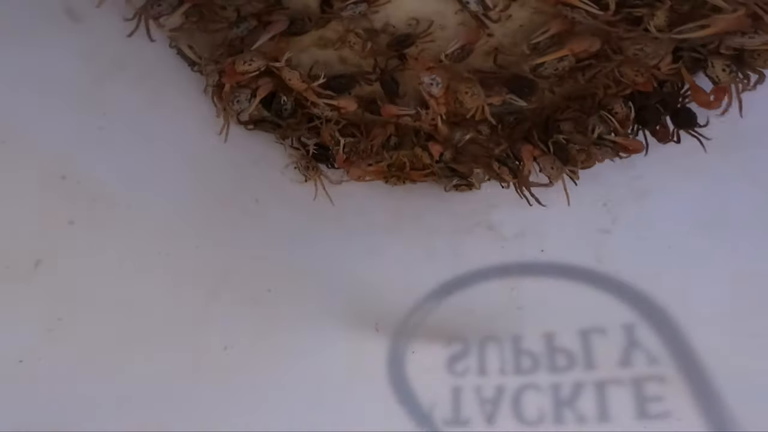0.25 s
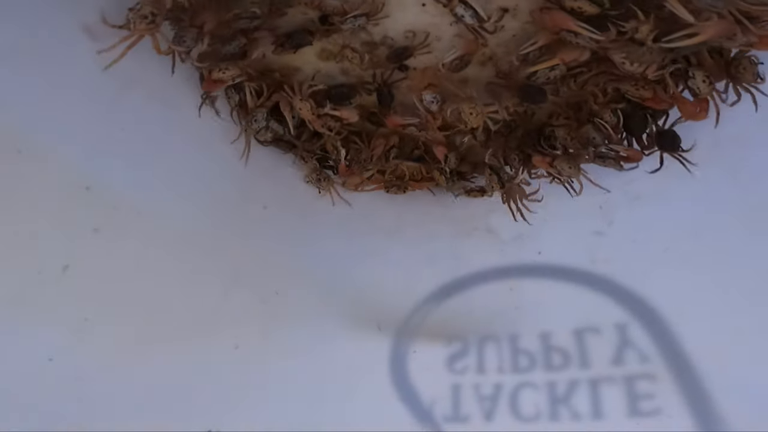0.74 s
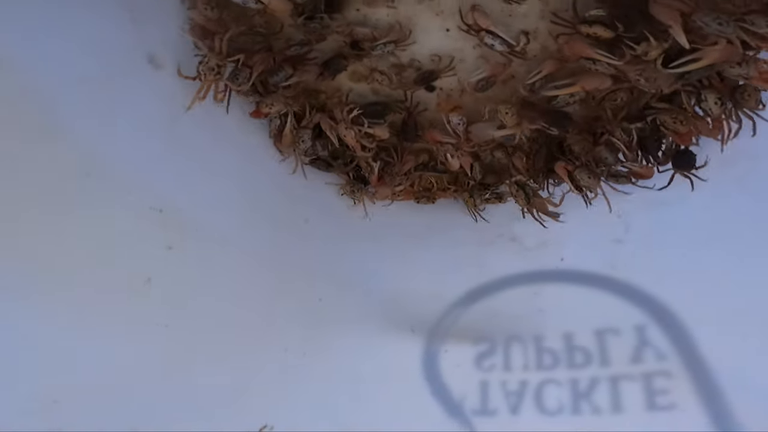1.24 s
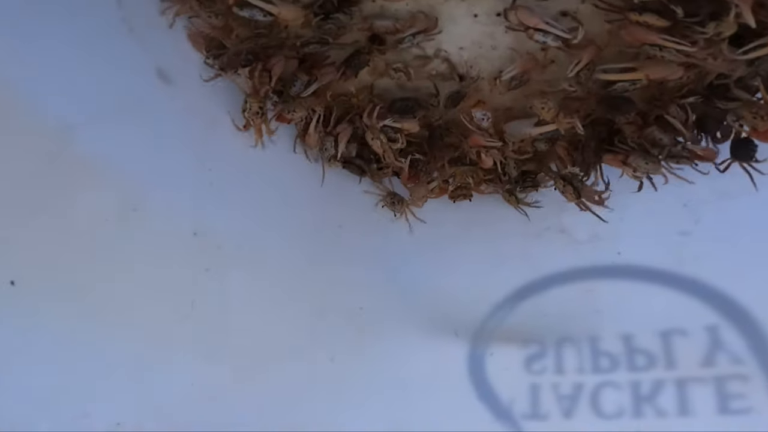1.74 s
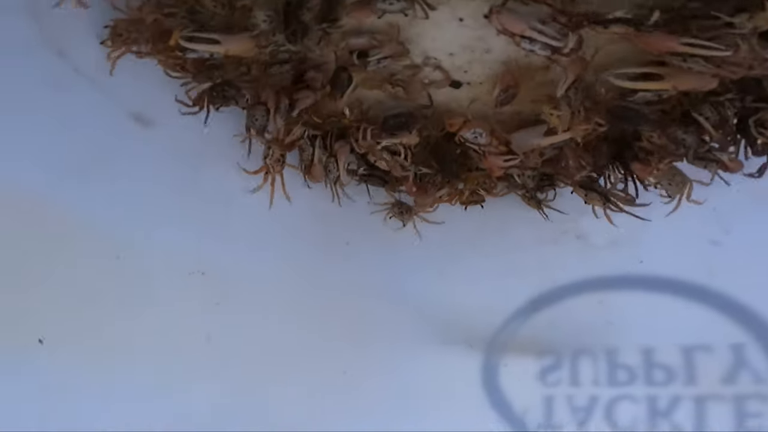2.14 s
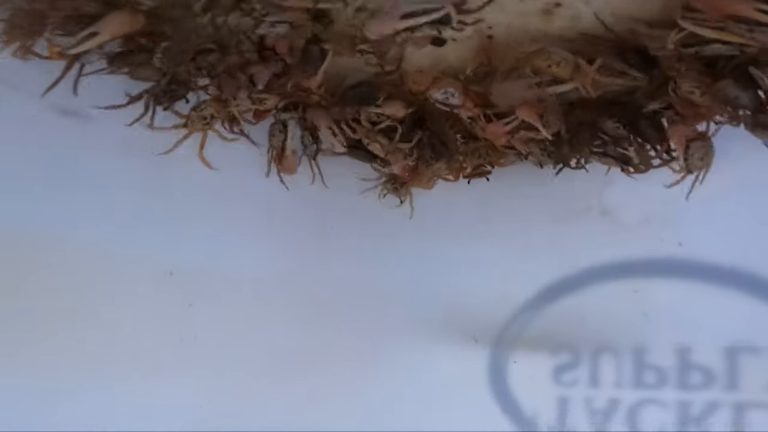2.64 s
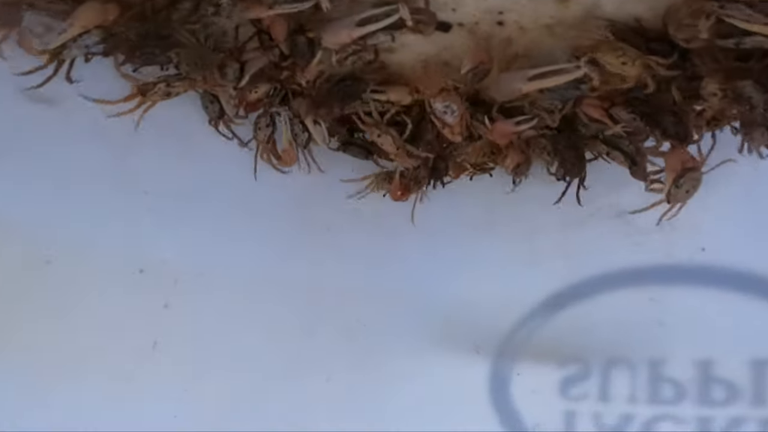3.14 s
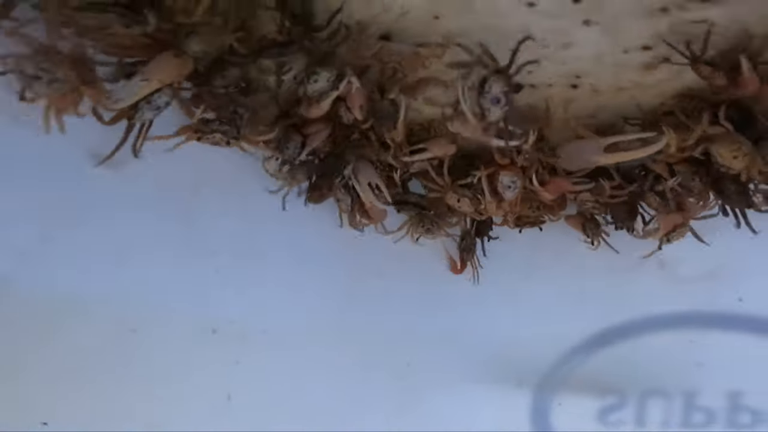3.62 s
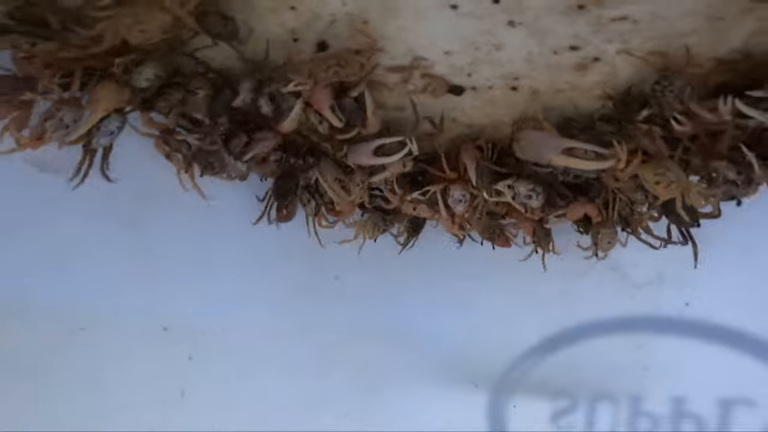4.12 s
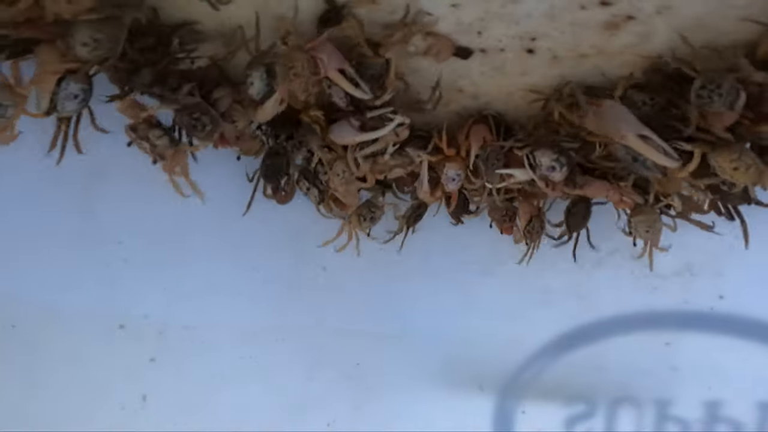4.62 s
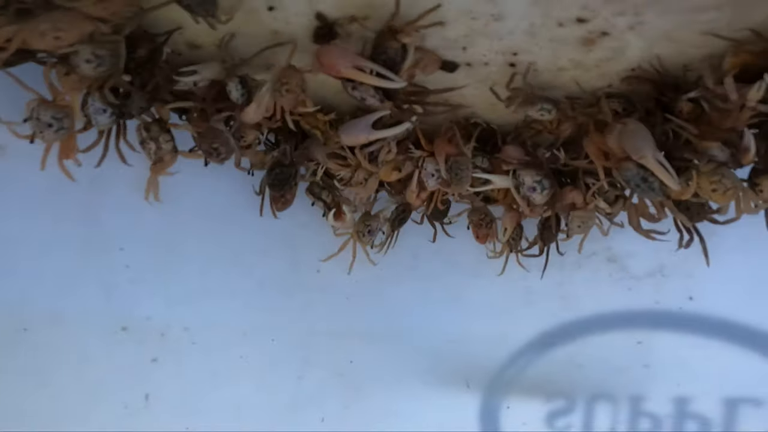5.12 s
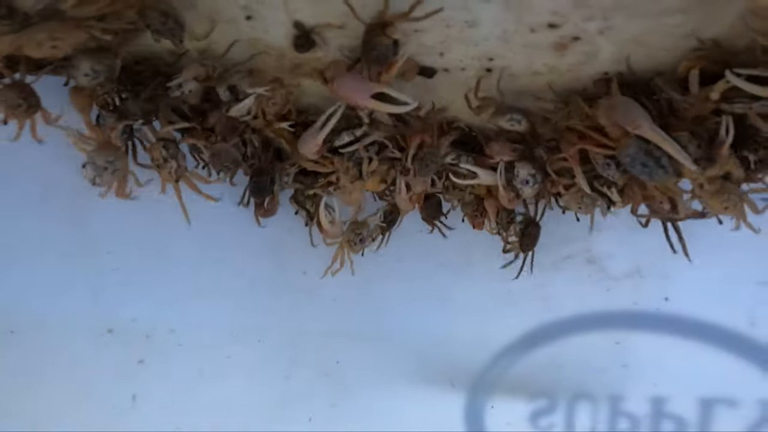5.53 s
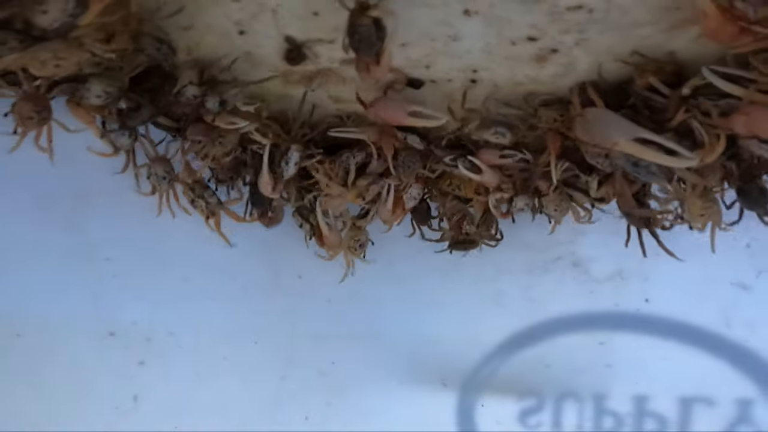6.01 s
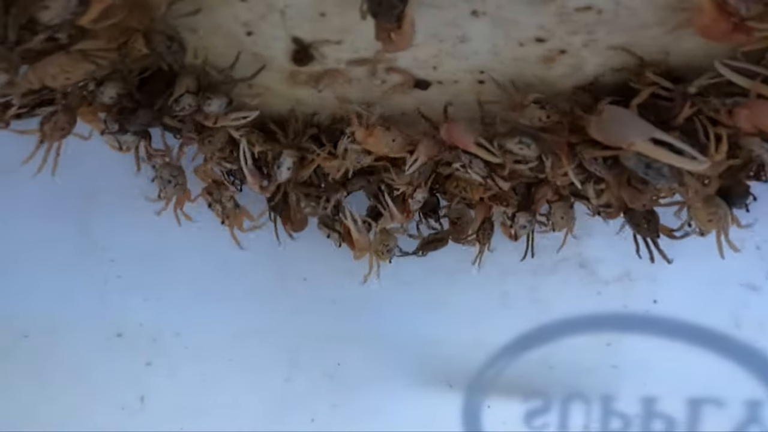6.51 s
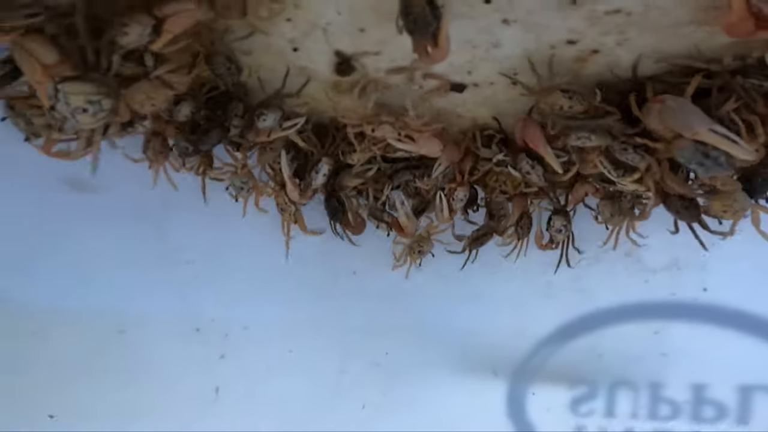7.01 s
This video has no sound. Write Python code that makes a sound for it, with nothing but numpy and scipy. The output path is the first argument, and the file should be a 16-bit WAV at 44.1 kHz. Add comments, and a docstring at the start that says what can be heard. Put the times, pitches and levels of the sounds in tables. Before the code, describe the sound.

Small live crabs scramble inside a plastic bucket as a microphone is lowered into it. At first their legs patter and scratch faintly over a low hollow boom. Dull knocks and brief rubbing on the bucket wall follow and stand out through the first half. The scrabbling then grows louder, closer and wider, with many sharp claw taps and short skids ringing lightly in the plastic.

```python
"""Small live crabs scramble in a plastic bucket as a microphone is lowered into it.
Legs patter and scratch on the wall and claws tap it; patter and taps ring the bucket's modes.
The wall booms under the swarm, thuds and swells when knocked, and rustles when rubbed.
Microphone depth changes which modes are heard; the stereo image opens near the swarm."""
import sys
import numpy as np
from scipy import signal
from scipy.io import wavfile

SR = 44100
rng = np.random.default_rng(int(sys.argv[2]) if len(sys.argv) > 2 else 0)


def wrap_up_sound(samples):
    """Save the sound to the file named by the first command line argument, as 16-bit audio."""
    columns = np.atleast_2d(samples).T
    # keep every value between -1 and 1, then stretch to whole-number steps
    tamed = np.clip(columns, -1, 1)
    steps = np.round(tamed * 32767).astype(np.int16)
    wavfile.write(sys.argv[1], SR, steps)


N = 320158


def amp(db):
    return 10 ** (np.asarray(db) / 20)


def unit_rms(x):
    return x / np.sqrt(np.mean(x ** 2) + 1e-20)


def butter(x, hz, kind="low", order=2):
    return signal.sosfilt(signal.butter(order, hz, kind, fs=SR, output="sos"), x)


def in_time(rows):
    times, *columns = np.transpose(rows)
    return [np.interp(np.arange(N) / SR, times, column) for column in columns]


def at_hz(rows, hz):
    freqs, values = np.transpose(rows)
    return np.interp(np.log(hz), np.log(freqs), values)


def drift(rate_hz):
    """Slow random wander, rms 1."""
    hop = 40
    r = np.exp(-2 * np.pi * rate_hz * hop / SR)
    slow = signal.lfilter([1], [1, -2 * r, r * r], rng.standard_normal(N // hop + 2002))[2000:]
    return np.interp(np.arange(N) / hop, np.arange(len(slow)), unit_rms(slow))


def ring(clicks, hz, t60_s):
    """One mode: a unit click starts a decaying sine of height 1."""
    r, w = amp(-60 / (t60_s * SR)), 2 * np.pi * hz / SR
    return signal.lfilter([0, np.sin(w)], [1, -2 * r * np.cos(w), r * r], clicks + 1e-18)


def grains(per_s, spread_db):
    """Random touches of uneven size, rms 1."""
    sizes = amp(spread_db * np.minimum(rng.exponential(1, N), 5)) * rng.choice([-1, 1], N)
    return unit_rms(sizes * (rng.random(N) < per_s / SR))


def strikes(times, levels_db):
    clicks = np.zeros(N)
    clicks[np.round(times * SR).astype(int)] = amp(levels_db)
    return clicks


def swell(clicks, rise_s):
    """Envelope: rises to each click's height in rise_s, then fades."""
    r = np.exp(-1 / (rise_s * SR))
    return signal.lfilter([np.e * (1 - r)], [1, -2 * r, r * r], clicks + 1e-18)


# Swarm activity: t/s, patter level/dB, sliding level/dB
SWARM = [(0.0, -54.5, -58.5), (.4, -54.5, -62), (.93, -56, -57), (1.3, -46, -54), (1.58, -43.5, -52),
         (1.82, -56.5, -57), (2.2, -46.5, -53.5), (2.5, -50.5, -52.5), (2.72, -43.5, -48.5),
         (3.1, -46.5, -50.5), (3.5, -44, -47.5), (3.95, -48, -51), (4.2, -45, -51), (5.1, -43.5, -50.5),
         (5.46, -39.5, -45), (5.8, -43, -47), (6.45, -41, -46), (7.26, -38.5, -45)]


def leg_patter():
    """Feet land on the wall at a wandering rate."""
    patter_db, _ = in_time(SWARM)
    return grains(per_s=350 * amp(3 * drift(7.6)), spread_db=4) * amp(patter_db - 31)


# Scratch spectrum: f/Hz, density/dB
SCRATCH_SPECTRUM = [(250, 3), (400, -42.5), (700, -15.5), (1200, -15), (2400, -15.5), (5000, -20.5),
                    (7400, -25.5), (8500, -34.5), (10500, -35.5), (13500, -36)]
# Scratch left-right likeness: f/Hz, coherence/0-1
SCRATCH_COHERENCE = [(300, 0.85), (1000, 0.27), (3000, 0.47), (6000, 0.48), (9000, 0.24), (13000, 0.22)]
# Claw skids: t/s, level/dB, top-octave offset/dB
SKIDS = [(1.5189, -41, -30), (2.239, -32, -24), (2.3391, -37, -19), (2.6778, -40, -30),
         (2.7397, -33.5, -26), (2.875, -24.5, -19), (2.9731, -42, -26), (3.2824, -35, -19),
         (3.4915, -34, -21), (3.543, -25.5, -23), (3.572, -25, -20), (3.66, -22.5, -34), (3.7219, -31, -31),
         (4.166, -31, -27), (4.3076, -33, -34), (4.5804, -33.5, -27), (4.6119, -37, -24),
         (4.7711, -29, -26), (4.796, -30, -24), (4.9467, -36, -23), (4.9985, -34, -28), (5.0664, -34, -25),
         (5.083, -31, -28), (5.2919, -32, -16), (5.4176, -31, -32), (5.4959, -30, -20), (5.554, -33.5, -24),
         (6.2736, -31, -24), (6.3375, -34, -25), (6.4388, -29.5, -26), (6.6174, -41, -26),
         (6.7456, -30, -16), (7.012, -41, -24), (7.095, -22.5, -21)]


def leg_scratch(depth):
    """Pointed legs slide on smooth plastic: dense grains, flaring at each skid, brighter close up."""
    _, sliding_db = in_time(SWARM)
    times, skid_db, top_db = np.transpose(SKIDS)
    rise_s = 0.0055
    flare = swell(strikes(times, skid_db - 12), rise_s)
    top_flare = swell(strikes(times, skid_db + top_db + 1.6), rise_s)
    small_skids = swell(np.abs(grains(per_s=70, spread_db=-2.5)), rise_s)
    sliding = amp(sliding_db + 0.5 + 1.97 * drift(11)) * (1 + 0.18 * unit_rms(small_skids))
    grit = np.sqrt(0.65 + 0.24 * grains(per_s=3600, spread_db=-0.5) ** 2)
    noise = rng.standard_normal((2, 2, N)) * grit
    edges_hz = 250 * 2 ** np.arange(0, 6.1, 0.5)
    out = np.zeros((2, N))
    for k, (low_hz, high_hz) in enumerate(zip(edges_hz, edges_hz[1:])):
        mid, side = butter(noise[k % 2], [low_hz, high_hz], "band")
        hz = np.sqrt(low_hz * high_hz)
        if low_hz > 7900:
            level = sliding * amp(4 * depth) + top_flare
        else:
            level = sliding + flare * (low_hz > 1900)
        gain = level * amp(at_hz(SCRATCH_SPECTRUM, hz) + 20.5 + 1.6 * drift(26.5))
        coherence = at_hz(SCRATCH_COHERENCE, hz)
        out += gain * (np.sqrt(1 + coherence) * mid + np.sqrt(1 - coherence) * side * [[1], [-1]])
    return out * amp([[0.85], [-0.85]])


# Bucket modes: f/Hz, rim level/dB, bottom level/dB, t60/s, left bias/dB, right lead/rad
BUCKET_MODES = [(546, -18.5, -1.5, 0.093, 1, 0.6), (748.5, -14, -4.5, 0.084, 2, 1.32),
                (908, -22, 0, 0.11, 7, 1.4), (1009, 3.5, -10.5, 0.12, 5, 1.18),
                (1255, 12.5, -24, 0.072, 8, 2), (1361, -10, -12.5, 0.28, -3.5, 1.71),
                (1574, -2.5, 7.5, 0.082, 1.5, -0.7), (1675, 1, 0.5, 0.08, -8.5, -1.1),
                (1740, -16, -10.5, 0.27, 5, 0.5), (1954, -10.5, -5.5, 0.095, -0.5, 1.58),
                (2120, -2.5, -13.5, .05, -7, 0.5), (2246, -2.5, -4, 0.11, 12, 0.4),
                (2240, -30, -31, .06, -4, -4), (2600, -10.5, -9, 0.13, -4, 1.2),
                (2700, -26.5, -14.5, 0.18, 13, .9), (2922, -6, -14, 0.16, 4.5, 0.6),
                (3146, -14.5, -12, 0.096, 6, 2.2), (3365, -2, -15.5, 0.059, -8, 1.5),
                (3700, -33, -42, .04, 8, 2), (3810, -19, -29, 0.13, 16, 1), (4184, -19, -14.5, 0.2, 0, 1.4),
                (4730, -39, -31, 0.042, 3, -8), (4800, -35, -39, .035, -0.5, -0.5)]


def bucket_ring(depth, rub_db):
    """Patter and taps ring every mode, weighted anew per touch; knocks ring two, rubbing one."""
    hollow_hz, wall_hz = 755, 547
    patter, knocks = leg_patter(), knock_pushes()
    out = np.zeros((2, N))
    for hz, rim_db, bottom_db, t60_s, pan_db, lead_rad in BUCKET_MODES:
        pickup = amp(rim_db + (bottom_db - rim_db) * depth)
        force = (patter * rng.standard_normal(N) + claw_taps(hz)) * pickup
        if abs(hz / hollow_hz - 1) < 0.1:
            force += knocks + rng.standard_normal(N) * amp(rub_db - 22.5)
        if abs(hz / wall_hz - 1) < 0.1:
            force += knocks * amp(np.interp(depth, [0, 1], [-28.5, 11]))
        mid = ring(force, hz, t60_s)
        quadrature = np.gradient(mid) * SR / (2 * np.pi * hz)
        side = np.tanh(pan_db / 17.4) * mid - np.tan(lead_rad / 2) * quadrature
        out += mid + side * [[1], [-1]]
    return butter(out, 5000)  # shell on plastic is a soft contact


def drumming(modes):
    """Many soft pushes keep the wall's low modes ringing; rms 1."""
    pushes = grains(per_s=370, spread_db=3.5)
    out = np.zeros(N)
    for hz, bandwidth_hz, db in modes:
        t60_s = np.log(1000) / (np.pi * bandwidth_hz)
        out += amp(db) * unit_rms(ring(pushes * rng.standard_normal(N), hz, t60_s))
    return unit_rms(butter(out, 230, order=3))


# Wall drum modes, upper and lower set: f/Hz, bandwidth/Hz, level/dB
UPPER_WALL_MODES = [(135.8, 15.8, 1.5), (161.6, 11, -0.5), (200, 85, -12.5)]
LOWER_WALL_MODES = [(63.2, 4.9, -3), (83.3, 14.2, 7.5), (35, 25, -23)]
# Steady boom: t/s, upper level/dB, lower level/dB
BOOM = [(0.0, -40.5, -40.5), (.78, -45.5, -42), (1.1, -34.5, -37.5), (1.4, -39, -34.5), (1.78, -39.5, -41),
        (2.0, -31.5, -43), (2.5, -34.5, -38.5), (3.0, -34.5, -40.5), (3.6, -27.5, -30), (3.9, -38.5, -38.5),
        (4.3, -32, -42), (4.7, -31, -36.5), (5.7, -32.5, -33.5), (6.1, -33, -30), (6.65, -28.5, -27),
        (6.95, -33.5, -40), (7.26, -25.5, -32)]
# Low booms of the knocks: t/s, level/dB
KNOCK_BOOMS = [(1.32, -36), (1.52, -28), (1.91, -28.5), (2.011, -18.5), (2.21, -17), (2.561, -22),
               (2.74, -18), (3.02, -20.5), (3.41, -15), (3.53, -13), (3.94, -35.5), (4.21, -25),
               (4.58, -32), (5.7, -30), (7.09, -31)]


def wall_boom():
    """The wall booms like a drum; knocks swell its upper and lower modes."""
    upper_db, lower_db = in_time(BOOM)
    knock_times, knock_db, *_ = np.transpose(KNOCKS)
    upper = amp(upper_db) + swell(strikes(knock_times, knock_db - 24.5), rise_s=0.018)
    lower = amp(lower_db) + swell(strikes(*np.transpose(KNOCK_BOOMS)), rise_s=0.022)
    return drumming(UPPER_WALL_MODES) * upper + drumming(LOWER_WALL_MODES) * lower


# Knocks on the wall: t/s, level/dB, settled f/Hz, hold/s, ring offset/dB
KNOCKS = [(0.045, -29, 175, 0.014, -28), (0.509, -29, 146, 0.033, -44), (0.829, -29.5, 107, 0.01, -40),
          (1.294, -25, 154, 0.03, -17), (1.319, -29, 140.5, 0.024, -24), (1.392, -20.5, 144, 0.028, -21),
          (1.543, -8, 140, 0.013, -20.5), (1.567, -4.5, 136, 0.011, -39), (1.6, -2, 140, 0.0065, -12),
          (1.929, -13, 118, 0.0066, -34), (2.018, -10.5, 172.8, 0.014, -13),
          (2.242, -3, 179.6, 0.0054, -17.5), (2.554, -15.5, 140.4, 0.03, -32),
          (2.574, -21.5, 141.5, 0.031, -35), (2.691, -18.5, 156, 0.015, -25), (2.743, -15.5, 73, 0.02, -30),
          (2.826, -20, 163, 0.0092, -37), (2.929, -16, 146, 0.0042, -26), (3.016, -12, 156, 0.026, -34),
          (3.407, -10.5, 169, 0.0073, -17), (3.424, -13.5, 56, 0.026, -18),
          (3.494, -2, 183.3, 0.0088, -18.5), (3.534, -12, 57.7, 0.016, -27),
          (3.633, -4.5, 142, 0.0097, -27.5), (3.659, -10, 152.6, 0.0079, -28.5),
          (3.969, -25.5, 97, 0.017, -13), (4.199, -12, 132.2, 0.021, -36), (4.599, -15, 90, 0.0079, -28),
          (5.434, -20.5, 144.4, 0.016, -24), (5.563, -19.5, 90, 0.022, -30.5),
          (5.714, -20, 149, 0.017, -35), (5.789, -18, 94, 0.012, -29), (6.329, -26, 136, 0.013, -22),
          (6.514, -12, 135, 0.007, -29), (6.615, -16, 116, 0.0078, -17), (6.737, -23, 88, 0.026, -20.5),
          (7.107, -23.5, 161, 0.057, -19)]


def knock_thuds():
    """A knock flexes the wall, holds during contact, then dies; pitch sags as the wall slackens."""
    out, t = np.zeros(N + SR), np.arange(SR // 2) / SR
    phase_s = t + 0.001008 * (1 - np.exp(-t / 0.0035))
    for start_s, db, hz, hold_s, _ in KNOCKS:
        at = round(start_s * SR)
        t60_s = 0.057 + 1.7 * hold_s
        envelope = amp(db - 3 - 60 * np.maximum(t - hold_s, 0) / t60_s)
        out[at:at + len(t)] += envelope * np.sin(2 * np.pi * hz * phase_s)
    return butter(out[:N], [40, 330], "band")


def knock_pushes():
    """A knock drives the bucket's modes with a soft push of about 1 ms."""
    times, db, _, _, ring_db = np.transpose(KNOCKS)
    return np.convolve(strikes(times, db + ring_db), np.hanning(36) / 13)[:N]


# Claw taps: t/s, level/dB, low-mode offset/dB
TAPS = [(0.1166, -33, -15), (0.186, -31, -24), (1.113, -35, 4), (2.2409, -27, 1), (2.4677, -31, -1),
        (2.4867, -23.5, -12), (2.599, -33, -20), (2.6408, -31, -21), (3.1502, -28, -21), (3.4154, -25.5, 2),
        (3.4348, -22, -20), (3.5199, -26, -10), (3.5444, -18.5, -9), (3.6621, -27.5, -12), (3.98, -30, -13),
        (4.1658, -22.5, -22), (4.2385, -25.5, -19), (4.2981, -25, -14), (4.3075, -20, -16),
        (4.4255, -38, -11), (4.4482, -34, -19), (4.4808, -28, -22), (4.596, -28.5, -8), (4.6199, -27, -17),
        (4.7374, -22.5, -27), (4.7533, -21.5, -26), (4.7724, -16, -19), (4.797, -13.5, -32),
        (4.8372, -22.5, -7), (4.9464, -21.5, -18), (5.0005, -16.5, -24), (5.052, -25.5, 0),
        (5.0815, -19.5, -23), (5.2813, -17.5, -17), (5.3928, -21.5, -24), (5.4184, -13, -28),
        (5.4608, -26.5, -21), (5.4943, -25, -20), (5.7864, -25, -20), (5.8411, -30, -17),
        (5.8744, -31, -16), (6.0776, -37, -9), (6.101, -28, -1), (6.2196, -17, -22), (6.2943, -15, -15),
        (6.4384, -14.5, -24), (6.4706, -24, -14), (6.544, -25, -16), (6.5869, -23.5, -9),
        (6.616, -18.5, -14), (6.6876, -31, -12), (6.7316, -24.5, -23), (6.745, -14.5, -16),
        (6.8352, -23, -8), (6.8673, -27.5, -10), (7.012, -17, -5)]


def claw_taps(mode_hz):
    """Force on one mode: each tap lands elsewhere and rolls on, so the modes start apart."""
    times, db, low_db = np.transpose(TAPS)
    place_db = 3 * rng.standard_normal(len(times))
    roll_s = rng.uniform(0, 0.0012, len(times))
    return strikes(times + roll_s, db - 17 + place_db + (mode_hz < 1150) * (low_db + 5))


# Claw shell modes: f/Hz, level/dB, t60/s
CLAW_MODES = [(1607, -2, 0.025), (2170, -11, 0.0086), (3560, -18.5, 0.012)]


def claw_clicks():
    """Each tap also clicks in the claw itself, short and broad, and bounces twice."""
    times, tap_db, _ = np.transpose(TAPS)
    delays_s = rng.uniform(0.001973, 0.0051, (len(times), 2)).cumsum(axis=1)
    losses_db = rng.uniform(1.25, 8, (len(times), 2)).cumsum(axis=1)
    hits = strikes(times, tap_db + 1)
    for delay_s, loss_db in zip(delays_s.T, losses_db.T):
        hits -= strikes(times + delay_s, tap_db - loss_db)
    clicks = sum(amp(db) * ring(hits, hz, t60_s) for hz, db, t60_s in CLAW_MODES)
    return butter(clicks, [1000, 5000], "band")


# Drags on the wall: release t/s, level/dB, growth/(dB/s)
DRAGS = [(1.54, -40.5, 43), (2.04, -43.5, 167), (2.24, -45, 59), (2.91, -43, 70), (3.44, -44.5, 97),
         (3.74, -47, 56), (4.25, -52.5, 25), (5.17, -49, 150), (6.7, -52, 28), (7.12, -47, 120)]


def drag_level_db():
    """Each drag grows until it lets go, then falls quickly to a faint floor."""
    floor_db, fade_db_per_s = -63.5, 151
    t, level_db = np.arange(N) / SR, np.full(N, floor_db)
    for release_s, db, growth_db_per_s in DRAGS:
        slope = np.where(t < release_s, growth_db_per_s, -fade_db_per_s)
        level_db = np.maximum(level_db, db + slope * (t - release_s))
    return level_db


def rubbing(rub_db):
    """Dull rustle of a hand or strap dragged on the wall."""
    rustle = butter(rng.standard_normal(N), [260, 700], "band")
    return unit_rms(rustle) * amp(rub_db - 9.5)


# Microphone path: t/s, depth/0-1 (rim to bottom), stereo width/0-1
DESCENT = [(0, 0.48, 0), (1.3, 0.36, 0.01), (1.6, 0.25, 0.12), (2.25, 0.24, 0.29), (2.5, 0.85, 0.38),
           (3.1, .55, 0.59), (4.5, 0.88, 0.73), (7.26, 0.81, 0.77)]


def scene():
    """Wall and crabs in mid-side stereo, widening along the microphone's path."""
    depth, width = in_time(DESCENT)
    rub_db = drag_level_db()
    wall = wall_boom() + knock_thuds() + rubbing(rub_db)
    left, right = claw_clicks() + bucket_ring(depth, rub_db) + leg_scratch(depth)
    wall_side = amp(-43) * np.roll(wall, 240)  # reaches the two microphone ports unequally
    mid = (left + right) / 2 + wall
    side = (left - right) / 2 + wall_side
    return mid + side * width * [[1], [-1]]


def record(dry):
    """Peaks are rounded, the microphone dulls the highest air, the top is cut."""
    rounded = np.tanh(dry / 0.89) * 1.044
    top_cut = signal.ellip(12, 0.5, 70, 15700, fs=SR, output="sos")
    return signal.sosfilt(top_cut, butter(rounded, 12000))


dry = scene()
out = record(dry)
wrap_up_sound(out)
```